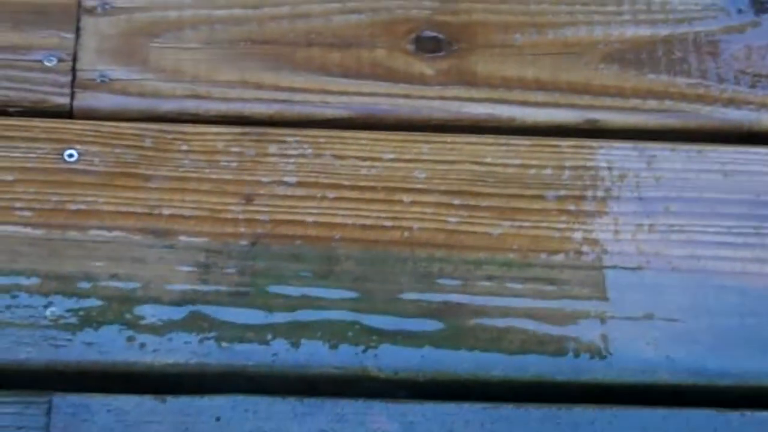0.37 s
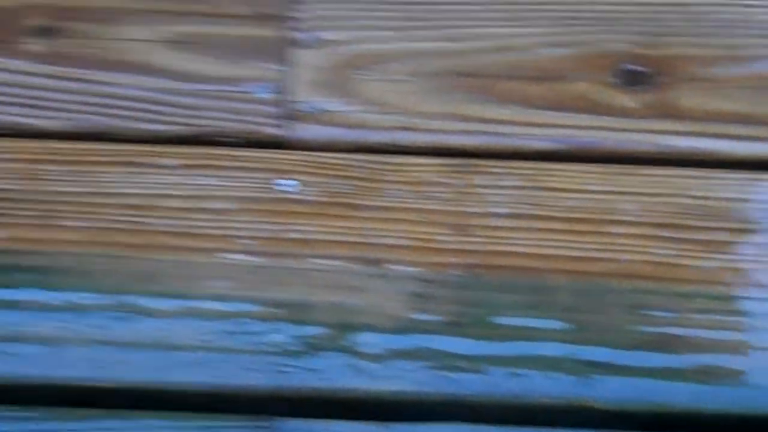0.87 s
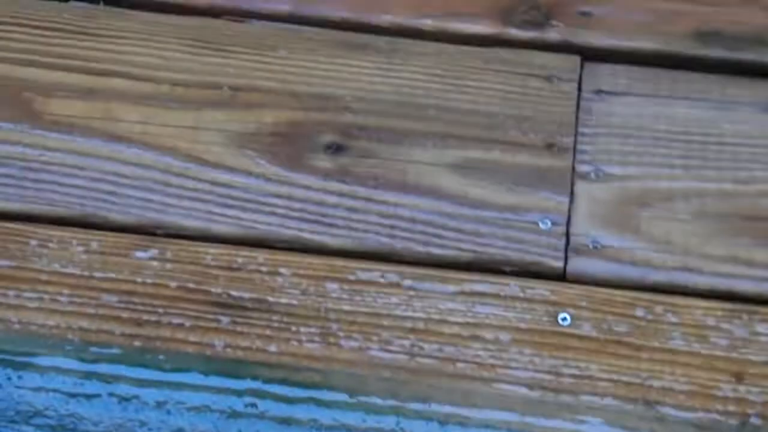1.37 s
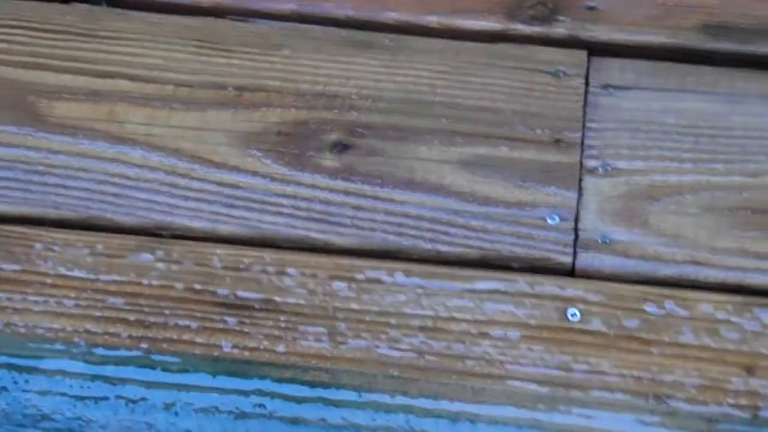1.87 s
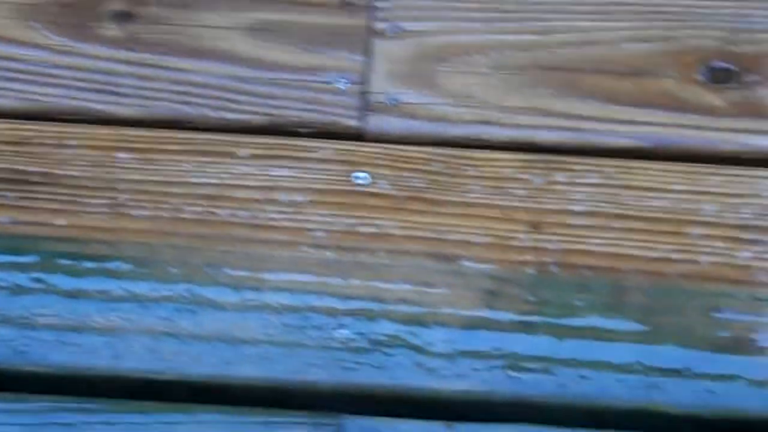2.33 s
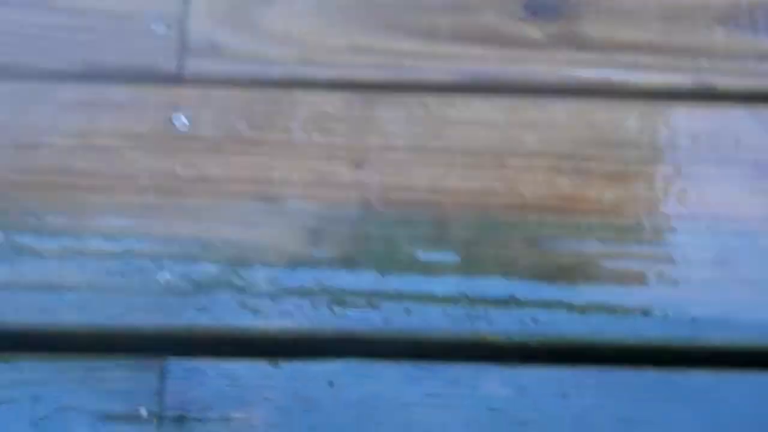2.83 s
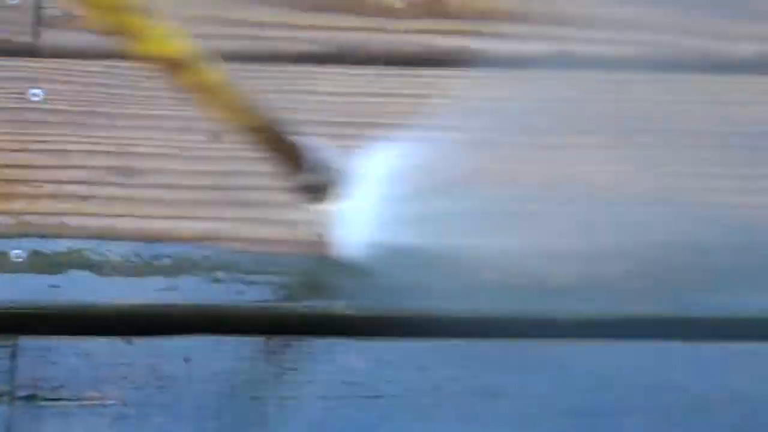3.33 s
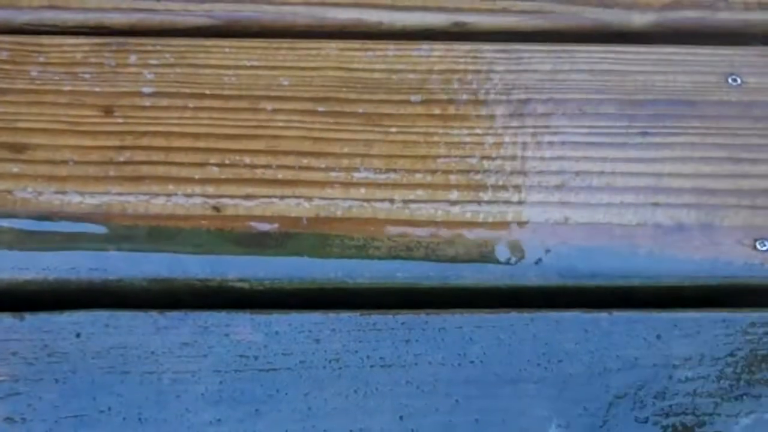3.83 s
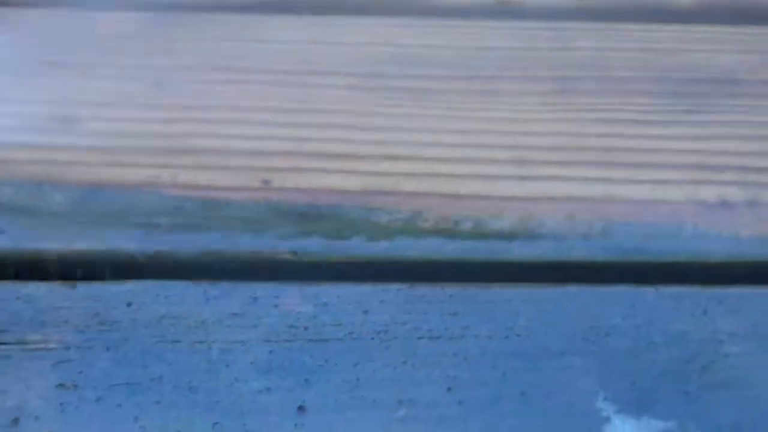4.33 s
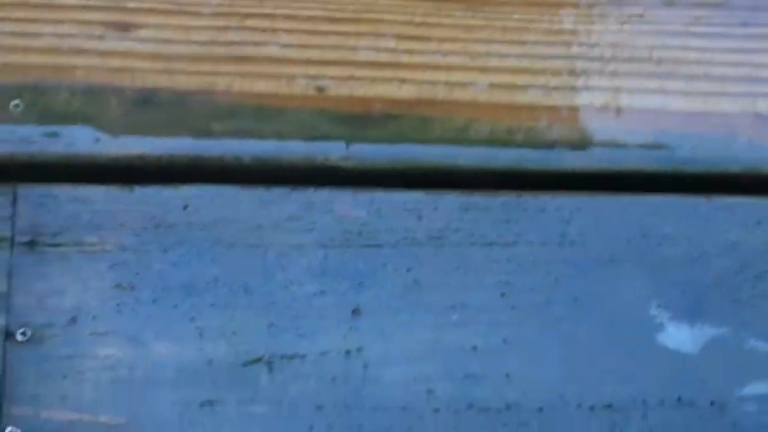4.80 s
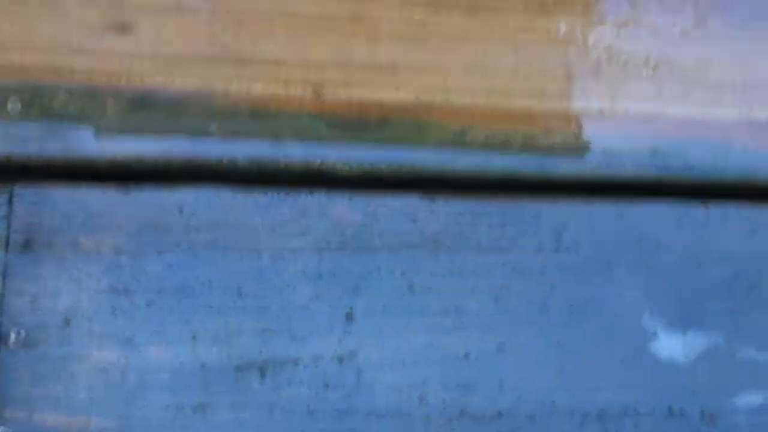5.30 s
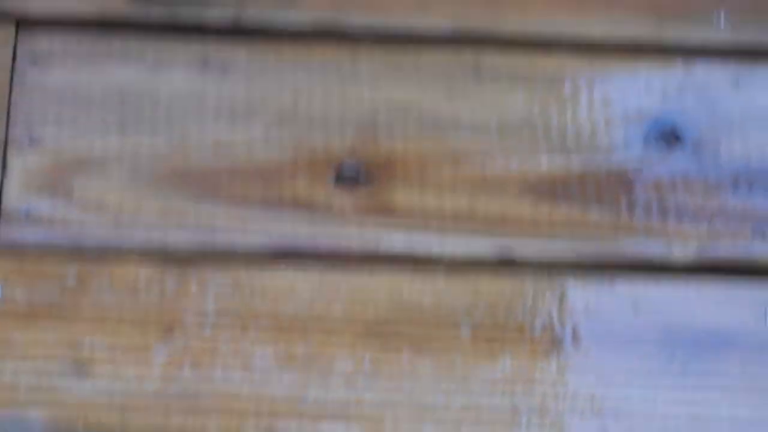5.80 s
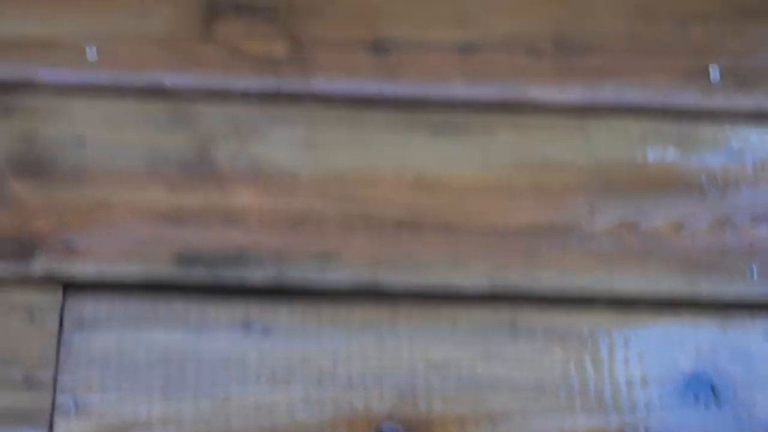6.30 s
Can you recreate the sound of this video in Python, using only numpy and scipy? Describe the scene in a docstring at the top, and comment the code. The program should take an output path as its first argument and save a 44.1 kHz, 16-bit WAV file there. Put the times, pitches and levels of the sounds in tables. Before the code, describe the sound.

Close, bright high-pressure water spray sweeps side to side on wooden planks, with an engine droning metres away and soft thumps of blown mist.

```python
"""A petrol pressure washer runs some metres off while its fan jet is swept to and fro along deck boards.
From the start the jet hisses (filtered noise), the planks drum (low noise), draught and mist buffet two
microphone ports (clumped spikes and noise), and the engine and pump hum (harmonics of the firing rate).
Jet bursts at the butt joints begin at 0.7 s; single hard thumps (damped pulses) begin at 2.6 s.
Spray and engine reach the capsules through a cavity resonance at each port."""
import sys
import numpy as np
from scipy import signal
from scipy.fft import rfft, irfft
from scipy.io import wavfile
from scipy.ndimage import map_coordinates

SR = 44100
rng = np.random.default_rng(int(sys.argv[2]) if len(sys.argv) > 2 else 0)


def voltage_ratio(decibels):
    """Convert decibels (scalar or array-like) to amplitude ratios, 20 dB per decade."""
    exponent = np.asarray(decibels, float) / 20
    return 10 ** exponent


def generate_wav(sig):
    """Save sig (samples, or channels by samples) to the path in sys.argv[1] as 16-bit PCM at SR."""
    pcm = np.round(np.clip(np.atleast_2d(sig).T, -1, 1) * 32767).astype(np.int16)
    wavfile.write(sys.argv[1], SR, pcm)


N = 283122
HZ = np.arange(N // 2 + 1) * SR / N + 1e-3   # bin frequencies, kept above zero for the logarithm


def rms_one(x):
    """Normalisation to unit mean power."""
    return x / np.sqrt(np.mean(x ** 2) + 1e-20)


def in_time(rows):
    """Linear interpolation: the columns of a table as curves, one value a sample."""
    s, *columns = np.transpose(rows)
    return [np.interp(np.arange(N) / SR, s, c) for c in columns]


def drift(rate_hz):
    """Slow random fluctuation of unit rms: white noise through two equal one-pole low-passes."""
    r = np.exp(-2 * np.pi * rate_hz / SR)
    noise = rng.standard_normal(N + SR)
    settled = signal.lfilter([1], [1, -2 * r, r * r], noise)[SR:]
    return rms_one(settled)


def swells(rows):
    """Superposed Gaussian level changes in dB, one for each row of centre, height and length."""
    t = np.arange(N) / SR
    return sum(db * np.exp(-((t - s) / length_s) ** 2) for s, db, length_s in rows)


def by_bearing(lead_us):
    """Directivity and distance: levels that depend on the bearing, read along the sweep."""
    # nominal lead_us, jet_at_right_db, draught_left_db, draught_right_db, drumming_db
    bearings = [(-64, -1.5, -31.5, -30, -43), (-37.5, -2.5, -41.5, -26, -40.5), (2, 0, -38, -35, -44),
                (14, 1, -35, -33, -51), (36, -0.5, -35.5, -40.5, -43.5), (45.5, -0.5, -41, -52.5, -40.5),
                (66.5, -3, -51.5, -55, -39.5), (68, -2.5, -57, -53, -39)]
    bearing, *columns = np.transpose(bearings)
    return [np.interp(lead_us, bearing, c) for c in columns]


def coloured(x, spectrum, low_hz, high_hz):
    """Spectral shaping by a zero-phase filter, with unit power inside the named band."""
    hz, db = np.transpose(spectrum)
    bins = rfft(x) * voltage_ratio(np.interp(np.log(HZ), np.log(hz), db))
    inside = bins[(HZ > low_hz) & (HZ < high_hz)]
    return irfft(bins, N) * N / np.sqrt(2 * np.sum(np.abs(inside) ** 2))


def three_noises(spectrum, low_hz, high_hz):
    """Mutually incoherent noises of one spectrum: one common to both ports, then one for each."""
    return np.array([coloured(w, spectrum, low_hz, high_hz) for w in rng.standard_normal((3, N))])


def from_the_side(x, lead_us, spread):
    """Interaural delay and decorrelation: left leads for positive lead_us; width adds noise at each port."""
    # a positive nominal lead is stretched by 1.2
    late = np.arange(N) - np.where(lead_us > 0, 1.2, 1) * lead_us * 1e-6 * SR
    delayed = map_coordinates(x[0], [late], order=5, mode="wrap")
    return np.array([x[0], delayed]) + spread * x[1:]


def jet(lead_us, hiss_db, splash_db, right_db):
    """Turbulent noise: fine hiss of the torn water sheet plus the lower splash of rebound on wood."""
    # spectra of the hiss and the splash: frequency_hz, density_db (per Hz)
    hiss_spectrum = [(2000, -19.5), (4000, -6), (6000, -6), (8000, -1), (10000, -2), (12000, 0), (14300, 2)]
    splash_spectrum = [(700, -38), (1500, -8), (2500, 0), (4000, -1), (6000, -6.5), (9000, -26.5)]
    # jet crossing a butt joint: centre_s, burst_db, length_s
    spits = [(.715, 3.5, .02), (2.073, 4.5, .012), (5.485, 3, .012), (4.58, 2, .015)]
    flutter_db = 0.28 * drift(27.0) + 0.21 * drift(3.7)   # pressure ripple and an unsteady hand
    hiss = three_noises(hiss_spectrum, 6000, 9000)
    splash = three_noises(splash_spectrum, 2000, 5000)

    # the hiss above 10 kHz beams: it fades at both ports as the jet swings to the right
    high_pass = signal.butter(2, 10000.0, "high", fs=SR, output="sos")
    top = signal.sosfiltfilt(high_pass, hiss)
    hiss = hiss + top * (voltage_ratio(0.06 * (lead_us - 80)) - 1)

    hiss_spread = 0.3 + 0.0045 * np.abs(lead_us)   # seen from the side, the fan looks wider
    both = voltage_ratio(hiss_db) * from_the_side(hiss, lead_us, hiss_spread)
    splash_gain = voltage_ratio(splash_db + 0.88 * drift(10.3))
    both += splash_gain * from_the_side(splash, lead_us, spread=0.76)
    return both * voltage_ratio(swells(spits) + flutter_db) * voltage_ratio([0 * right_db, right_db])


def planks(db, lead_us):
    """Forced vibration and diffraction: the boards drum in long waves that bend round the housing."""
    # spectrum of the drumming: frequency_hz, density_db (per Hz)
    drum_spectrum = [(30, -30), (60, -23), (130, 0.5), (250, -2.5), (600, 1.5), (1000, 2), (1400, 1.5),
                     (2500, -0.5), (5000, -38)]
    drum = three_noises(drum_spectrum, 400, 1200)
    # waves that bend round the housing arrive further apart
    both = from_the_side(drum, 1.03 * lead_us, spread=0.19)
    waver_db = 1.0 * drift(5.0)
    return voltage_ratio(db + waver_db) * both * voltage_ratio([[-1.1], [1.1]])


def draught(db, spectrum, per_s, size_db):
    """Shot noise: mist droplets and eddies strike one port in clumps, as one-way spikes over a rush."""
    clumps = voltage_ratio(2.5 * drift(30.0) + 1.5 * drift(8.0))
    struck = rng.random(N) < per_s * clumps / SR
    sizes = voltage_ratio(size_db * np.minimum(rng.exponential(1, N), 4))
    spikes = rms_one(struck * sizes)
    rush = 0.65 * np.sqrt(clumps) * rng.standard_normal(N)
    return voltage_ratio(db) * coloured(spikes - spikes.mean() + rush, spectrum, 400, 1200)


def engine():
    """Harmonic series: one exhaust pulse every second turn; three plungers a turn hum at order six."""
    # load on the pump, heard as the level of its hum: time_s, level_db
    load = [(0, -46), (.6, -43), (1.0, -41), (1.5, -42), (2.1, -42), (2.6, -45.5), (3.2, -42.5), (3.7, -42),
            (4.4, -43), (5.2, -45), (5.6, -42.5), (6.42, -41)]
    # exhaust pulse: order (of the firing rate), level_db (relative)
    exhaust = [(1, -25), (2, -14), (3, -17), (4, -6.5), (5, -7), (7, -6), (8, -10), (9, -20.5), (10, -10),
               (11, -33), (13, -10.5), (14, -44), (15, -13.5), (16, -25), (17, -14)]
    firings_per_s = 27.375
    pump_db, = in_time(load)
    above_mean_db = pump_db + 43   # mean load is -43 dB
    exhaust_db = -43.5 + 0.94 * above_mean_db
    overtone_db = -55 + 4.2 * above_mean_db
    # the governor hunts a little
    phase = 2 * np.pi * firings_per_s * np.arange(N) / SR + 0.096 * drift(2.0)

    pulse = sum(voltage_ratio(db + .7 * drift(3.0)) * np.cos(order * (phase + 1.0) + 2.5) for order, db in exhaust)
    stroke = 6 * phase + 1.2
    hum = voltage_ratio(exhaust_db) * pulse
    hum = hum + voltage_ratio(pump_db + 1.0 * drift(3.8)) * np.cos(stroke)
    hum = hum + voltage_ratio(overtone_db) * np.cos(2 * stroke)
    return np.sqrt(2) * hum * voltage_ratio([[-.9], [.9]])   # right port 1.8 dB louder


def thumps():
    """Damped transient response: a gust front jerks a membrane aside; it creeps back and overshoots."""
    # single hard buffets: start_s, level_db (before decay and high-pass), direction (+1 or -1),
    # length_ms, port (0 left, 1 right)
    buffets = [(2.5600, -14, -1, .4, 0), (2.7480, -11, -1, .5, 0), (2.8055, -12, -1, .5, 0),
               (3.4450, -14, -1, 1.0, 1), (3.6110, -15, -1, 1.6, 1), (3.6435, -12, 1, 1.4, 1),
               (3.7452, -6.5, -1, 1.7, 1), (4.2540, -8, 1, .6, 1), (4.5710, -10, 1, .9, 1)]
    out = np.zeros((2, N))
    for start_s, db, direction, length_ms, port in buffets:
        age = np.maximum(np.arange(N) / SR - start_s, 0) * 1000 / length_ms   # in lengths
        rise = np.minimum(age * length_ms / .15, 1)   # over 0.15 ms
        out[port] += direction * voltage_ratio(db) * rise * (1 - age / 1.5) * np.exp(-age / 1.5)
    high_pass = signal.butter(2, 70, "high", fs=SR, output="sos")
    return signal.sosfilt(high_pass, out + 1e-18)


def ports(x):
    """Helmholtz resonance: a small cavity in front of each capsule, coloured by the housing."""
    # ports, left then right: cavity_hz, sharpness_q, extra_treble_loss_db (per octave above the cavity)
    cavities = [(7720, 6.52, 0), (6940, 4.63, 12)]
    # resonances of the housing, a list for the left and one for the right port:
    # frequency_hz, sharpness_q, gain_db
    housings = [
        [(1290, 4.3, -5), (1990, 3, -1), (14070, 5, 8.5)],
        [(1200, 2.9, 2.5), (1570, 2.53, -10), (2510, 6.5, -11), (4340, 6, -7), (8350, 2.7, -4), (10700, 1.5, 2),
         (14000, 6.4, -10)],
    ]
    out = []
    for side, housing, (cavity_hz, q, loss_db) in zip(x, housings, cavities):
        ratio = HZ / cavity_hz
        gain = voltage_ratio(-loss_db * np.log2(np.maximum(ratio, 1))) / (1 - ratio ** 2 + 1j * ratio / q)
        for hz, sharp, db in housing:
            detune = 1 - (HZ / hz) ** 2
            damping = 1j * HZ / hz / sharp
            gain = gain * (detune + damping * voltage_ratio(db / 2)) / (detune + damping * voltage_ratio(-db / 2))
        out.append(irfft(rfft(side) * gain, N))
    return np.array(out)


def scene():
    """Superposition at the two capsules; the draught sucks at the left port and pushes at the right."""
    # sweep of the lance: time_s, lead_us (nominal lead of the left port), hiss_db, rebound_db (off the wood)
    sweep = [(0.0, 31.5, -29.5, -32.5), (0.42, 50.5, -30, -34.5), (0.72, 61, -33, -40),
             (1.0, 70, -32.5, -32.5), (1.5, 69, -33, -28.5), (1.98, 51, -30, -29), (2.26, 40.5, -29, -38),
             (2.72, 34.5, -29, -31.5), (3.1, 13, -30, -31.5), (3.3, -1, -31, -31.5), (3.65, -36, -30, -32),
             (4.0, -62, -27.5, -28), (4.32, -13, -30.5, -32.5), (4.64, 25, -30, -34.5),
             (4.9, 40, -30.5, -32), (5.52, 65, -32, -37.5), (6.0, 72, -33, -33), (6.24, 76, -31.5, -29),
             (6.42, 72, -32, -29)]
    # the jet bites into the boards at the turn of a stroke: centre_s, extra_drumming_db, length_s
    bites = [(1.5, 7.5, 0.12), (4.03, 8, 0.13), (6.19, 8.5, 0.14)]
    # the draught swells or drops at one port: centre_s, change_db, length_s, port (0 left, 1 right)
    gusts = [(.2, 2, .08, 0), (0.438, 9, 0.043, 0), (0.648, 7, 0.073, 0), (.78, -14, 0.071, 0),
             (1.54, -3, .06, 0), (1.9, 1, .15, 0), (2.53, 4.5, 0.068, 0), (2.782, 3, .08, 0),
             (3.09, 3.5, 0.11, 0), (4.75, -2.5, 0.25, 0), (5.488, 9, .06, 0), (5.615, -14, 0.082, 0),
             (6.2, 9, .08, 0), (.22, -3, .07, 1), (1.54, -4, .06, 1), (2.2, -8, .06, 1), (2.64, 3, .05, 1),
             (3.084, 3.5, 0.066, 1), (3.416, 3.5, 0.055, 1), (4.072, -14, 0.11, 1), (4.613, 1, 0.058, 1),
             (4.73, -1, 0.057, 1)]
    # spectra of the draught at each port: frequency_hz, density_db (per Hz)
    left_spectrum = [(25, -26), (50, -5), (130, -1), (400, 1), (900, -0.5), (2000, -6), (5000, -15),
                     (14000, -27)]
    right_spectrum = [(25, -23), (50, -8.5), (130, -4), (600, -3.5), (1400, -5.5), (4000, -9), (8000, -14),
                      (14000, -18.5)]

    lead_us, hiss_db, rebound_db = in_time(sweep)
    shade_db, left_db, right_db, drum_db = by_bearing(lead_us)
    # drumming follows the rebound by 0.52 dB per dB
    drum_db = drum_db + 0.52 * (rebound_db - rebound_db.mean()) + swells(bites)
    left_db = left_db + swells([row[:3] for row in gusts if row[3] < .5])
    right_db = right_db + swells([row[:3] for row in gusts if row[3] > .5])

    left = -draught(left_db, left_spectrum, per_s=600.0, size_db=4.5)
    right = draught(right_db, right_spectrum, per_s=900.0, size_db=4.5)
    spray = jet(lead_us, hiss_db, rebound_db, shade_db) + planks(drum_db, lead_us)
    # draught and thumps act on the capsules directly
    return ports(spray + engine()) + np.array([left, right]) + thumps()


def roll_off(x):
    """The treble ends steeply here."""
    return signal.sosfilt(signal.butter(12, 15510, fs=SR, output="sos"), x)


def record(dry):
    """Saturation and band limiting: the loudest peaks are rounded and the top is cut off sharply."""
    rounded = dry / (1 + np.abs(dry / .85) ** 6) ** (1 / 6)
    cutoff_hz = 14200
    mix = irfft(rfft(rounded) / (1 + (HZ / cutoff_hz) ** 500), N)
    return roll_off(mix)


dry = scene()
out = record(dry)
generate_wav(out)
```